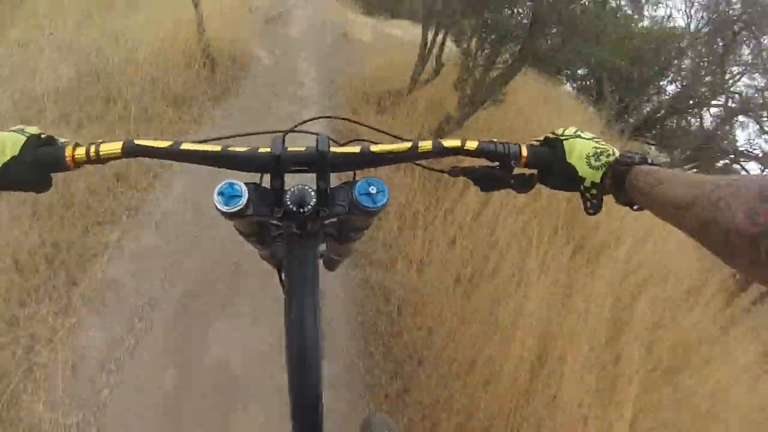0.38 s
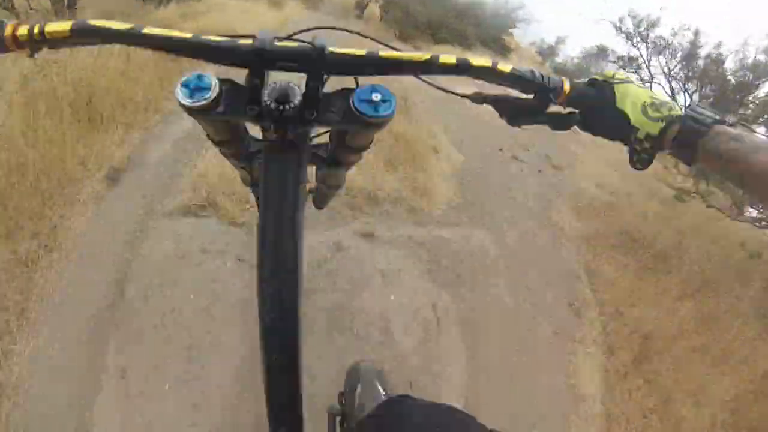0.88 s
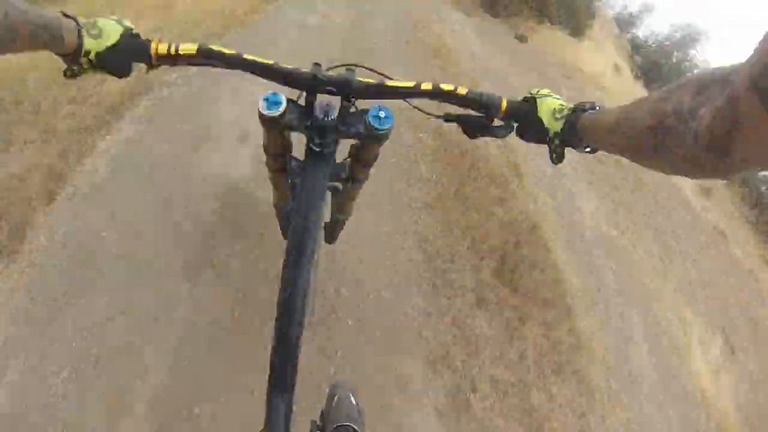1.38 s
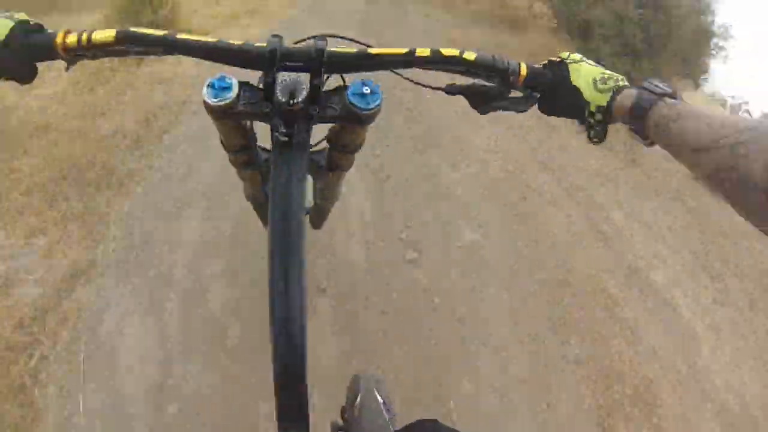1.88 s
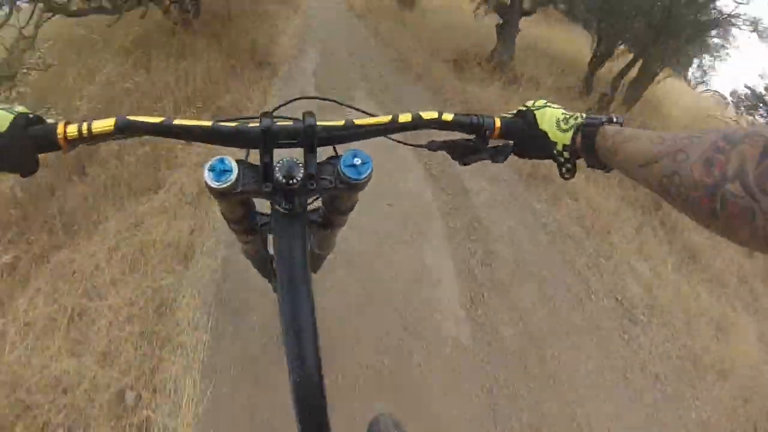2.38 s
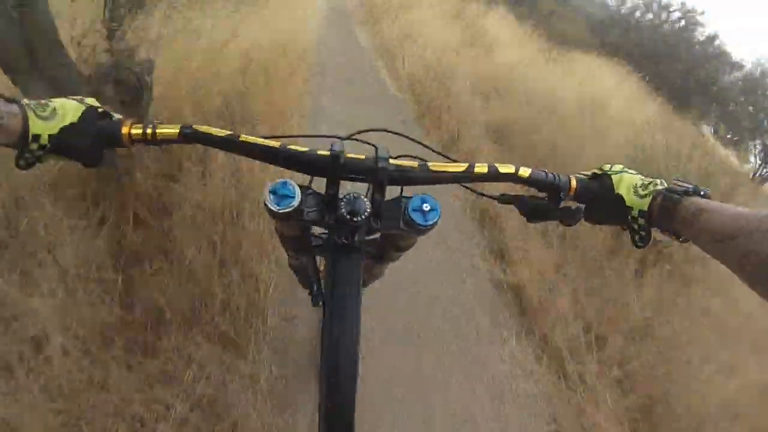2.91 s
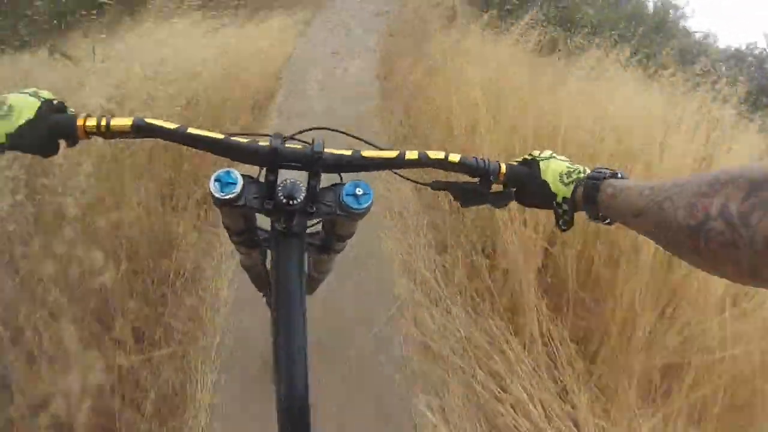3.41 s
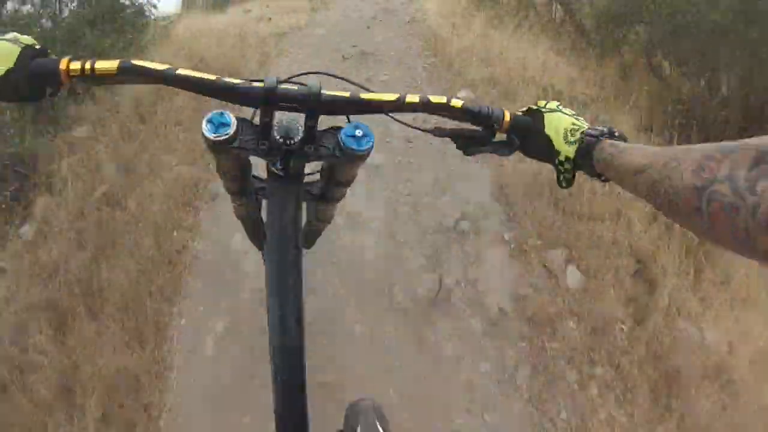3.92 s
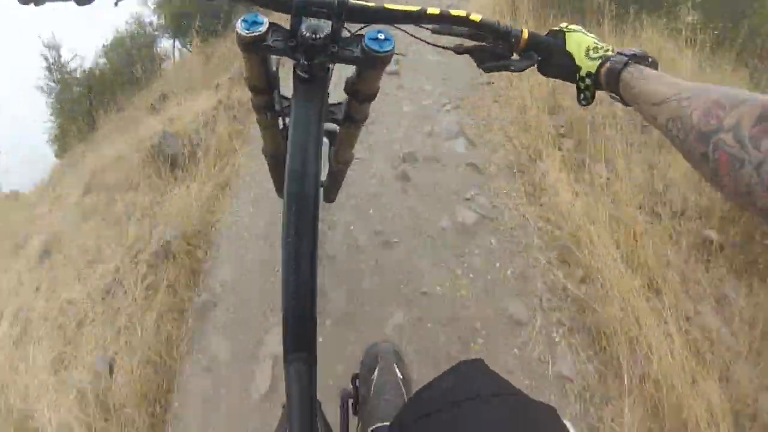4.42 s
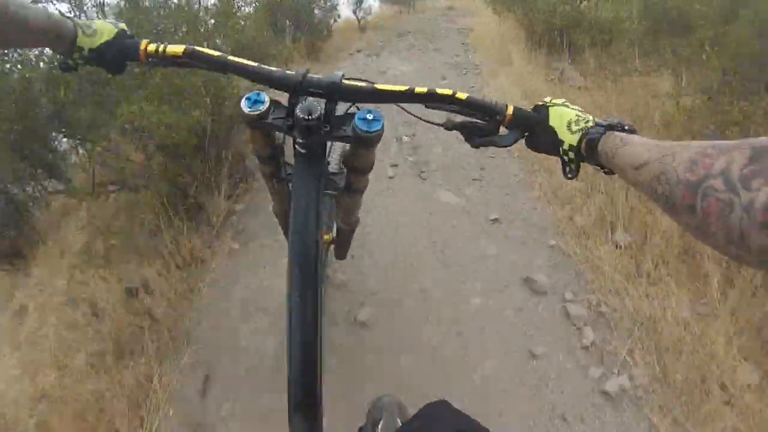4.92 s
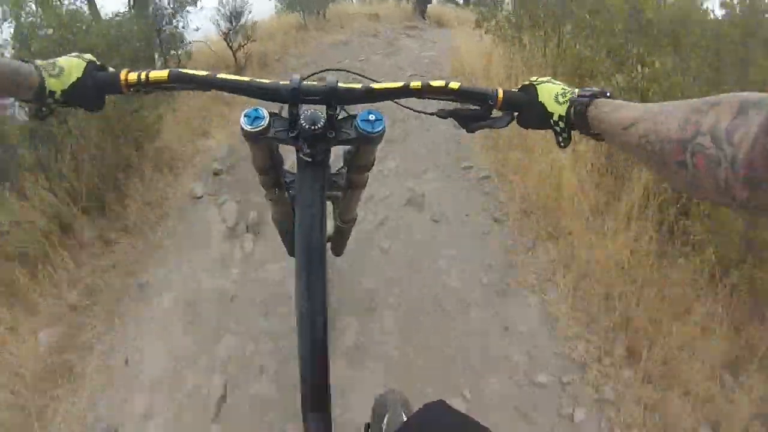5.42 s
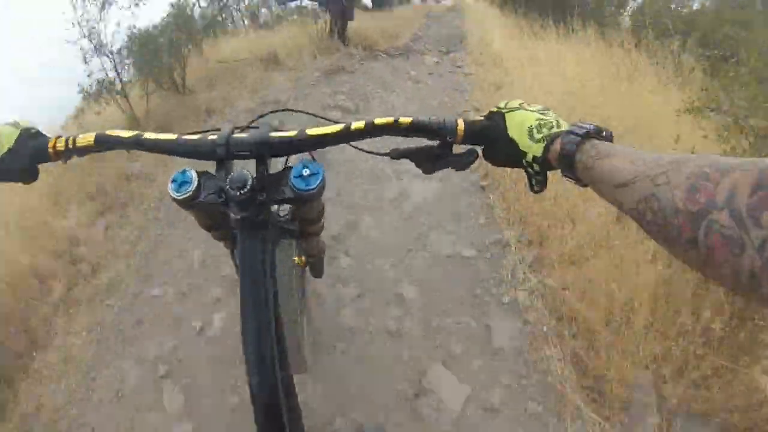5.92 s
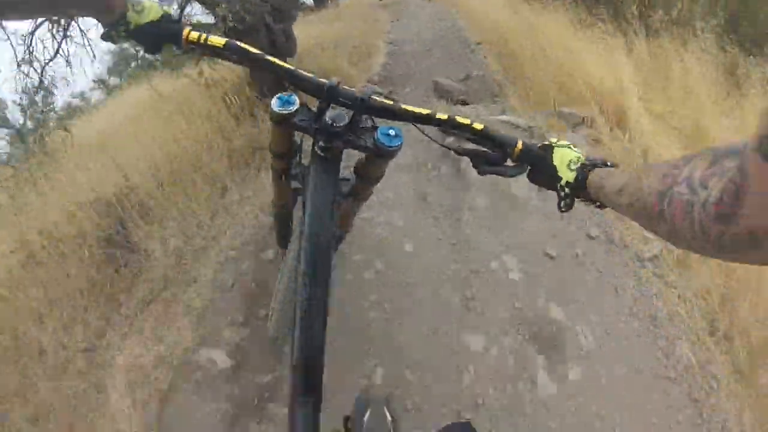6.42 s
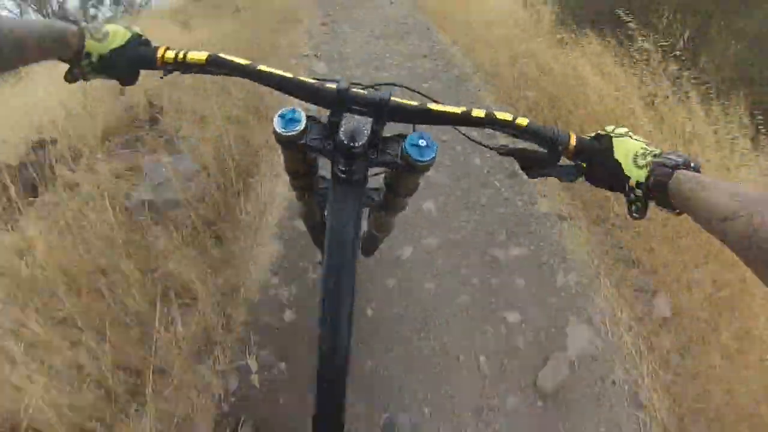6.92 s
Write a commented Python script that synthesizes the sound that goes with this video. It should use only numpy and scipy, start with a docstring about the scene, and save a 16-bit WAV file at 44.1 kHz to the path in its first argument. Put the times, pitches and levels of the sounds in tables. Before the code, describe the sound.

Muffled wind rumble, gritty tyre crunch and metallic chain rattle on a fast dirt descent; wind drops away as the bike slows over clattering rocks.

```python
"""Wind buffets and roars over a camera in a closed case on a mountain biker's chest, on a dry trail.
Under it tyres crunch (grain noise in bursts) and the chain jingles and slaps the frame (ringing modes).
Wheels thud on ground and rocks (damped swings), parts chirp, the camera mount snaps (a crack and a knock),
a brake disc squeaks thinly (wavering sines) and grass brushes past (bright noise).
The wind, filtered noise on a level curve, falls as the bike slows among stones."""
import sys
import numpy as np
from scipy import signal
from scipy.fft import rfft, irfft, next_fast_len
from scipy.io import wavfile
from scipy.ndimage import uniform_filter1d

SR = 44100
rng = np.random.default_rng(int(sys.argv[2]) if len(sys.argv) > 2 else 0)


def rack_gain(trim_db):
    """Turn a fader trim in dB into the linear factor to multiply a signal by."""
    fader = np.asarray(trim_db, float)
    return 10 ** (fader / 20)


def to_wav(sig):
    """Store sig (one row per channel, or 1-D mono) as 16-bit WAV at the path in sys.argv[1].

    Samples outside -1..1 are clipped; the rate is SR.
    """
    pcm = np.clip(np.atleast_2d(sig), -1, 1) * 32767
    pcm = np.round(pcm).astype(np.int16)
    wavfile.write(sys.argv[1], SR, pcm.T)  # frames by channels


N = 311346  # samples


def walk(rate_hz):
    """Random levels, each held 1 / rate_hz, smoothed twice; spread near 1."""
    hold = int(SR / rate_hz)
    steps = np.repeat(rng.standard_normal(N // hold + 1), hold)
    return 0.96 * uniform_filter1d(uniform_filter1d(steps, hold), hold)[:N]


def unit(x):
    """Scale to rms 1."""
    return x / np.sqrt(np.mean(x ** 2))


def colour(x, spectrum):
    """Filter by a (freq_hz, gain_db) spectrum, joined on a log axis; rms 1."""
    size = next_fast_len(N)
    freq_hz, gain_db = np.transpose(spectrum)
    bin_hz = np.maximum(np.arange(size // 2 + 1) * SR / size, 1)
    gain = rack_gain(np.interp(np.log(bin_hz), np.log(freq_hz), gain_db))
    return unit(irfft(rfft(x, size) * gain, size)[:N])


def grit(rate_hz, spread_db):
    """Random clicks, most small and a few large; rms 1."""
    draw = rng.random((N, 3))
    size = rack_gain(-spread_db * np.log(1 - draw[:, 1])) * np.sign(draw[:, 2] - 0.5)
    return unit(size * (draw[:, 0] < rate_hz / SR))


def flurries(rate_hz, spread_db, t60_s):
    """Envelope of random small knocks, each dying exponentially."""
    decay = rack_gain(-60 / (t60_s * SR))
    return signal.lfilter([1], [1, -decay], np.abs(grit(rate_hz, spread_db)))


def ring(modes, scatter_db):
    """Sum of decaying modes; every blow lands elsewhere, so weights and pitches scatter."""
    freq_hz, level_db, t60_s = np.transpose(modes)[:, :, None]
    luck = rng.standard_normal((2, len(modes), 1))
    t = np.arange(1024) / SR
    envelope = rack_gain(level_db + scatter_db * luck[0] - 60 * t / t60_s)
    return np.sum(envelope * np.sin(2 * np.pi * freq_hz * (1 + 0.022 * luck[1]) * t), axis=0)


def add(out, start_s, sound, peak_db):
    """Lay a sound in at start_s with the given peak."""
    i = int(start_s * SR)
    sound = sound[:N - i]
    out[i:i + len(sound)] += sound * rack_gain(peak_db) / np.max(np.abs(sound))


def curve(table):
    """(time_s, level_db) points joined by lines, one value per sample."""
    time_s, level_db = np.transpose(table)
    return np.interp(np.arange(N) / SR, time_s, level_db)


def bumps(rows):
    """Sum of smooth (centre_s, change_db, length_s) swells or dips, in dB."""
    t = np.arange(N) / SR
    return sum(change_db * np.exp(-((t - centre_s) / length_s) ** 2) for centre_s, change_db, length_s in rows)


# airflow over the case: time_s, roar_db
AIRFLOW = [(0.0, -25.5), (0.6, -24.5), (0.96, -26.5), (1.1, -24), (1.4, -22), (1.8, -22.5), (2.0, -13.5),
           (2.27, -14.5), (2.6, -17.5), (2.8, -21), (3.02, -23), (3.27, -20), (3.52, -20.5), (4.07, -22),
           (4.15, -27), (4.52, -32), (4.62, -35.5), (5.62, -41), (6.2, -48.5), (6.86, -37), (7.06, -37)]
# big eddies that hit the case: centre_s, rise_db (of the buffeting), length_s
EDDY_THUMPS = [(.37, 5, 0.1), (.95, 10, 0.078), (1.25, 10, 0.099), (1.82, 9.5, 0.1), (1.91, 9.5, 0.015),
               (2.72, 4.5, 0.035), (3.06, 13, 0.022), (4.03, 5.5, 0.094), (6.86, 3.5, 0.073)]
# brief dips and swells of the roar: centre_s, change_db, length_s
ROAR_GUSTS = [(.85, -5, 0.036), (.96, 6.5, 0.038), (1.842, -11.5, 0.029), (1.92, -6, 0.027),
              (4.035, 1.5, 0.04), (4.49, 6, 0.021)]
# spectrum of the buffeting: freq_hz, gain_db
BUFFET_SPECTRUM = [(15, 2), (25, 10), (45, 6), (85, 9), (150, 2), (280, -0.5), (600, -59.5)]
# spectrum of the roar: freq_hz, gain_db
ROAR_SPECTRUM = [(71, -14), (120, -1.5), (420, -4), (682, -8), (1000, -11.5), (1180, -18.5), (2800, -33),
                 (4740, -46), (10900, -62), (15000, -61)]
BUFFET_AT_0_DB, BUFFET_DB_PER_DB = -14, 0.62  # buffeting at a 0 dB roar; its gain per dB of roar
DARKEN_HZ, DARKEN_DB_PER_DB, FULL_ROAR_DB = 407, 0.15, -17.5


def wind():
    """Big eddies thump the case; small ones roar in quick gusts, and slower air roars darker."""
    flow_db = curve(AIRFLOW)
    buffet_db = BUFFET_AT_0_DB + BUFFET_DB_PER_DB * flow_db + bumps(EDDY_THUMPS)
    roar_db = flow_db + bumps(ROAR_GUSTS)
    buffet = colour(rng.standard_normal(N) * rack_gain(1.3 * walk(25)), BUFFET_SPECTRUM)
    eddies = rng.standard_normal(N) * rack_gain(1.19 * walk(40) + 1.4 * walk(150))
    roar = colour(eddies, ROAR_SPECTRUM)
    low = signal.sosfiltfilt(signal.butter(1, DARKEN_HZ, fs=SR, output="sos"), roar)
    # highs fall below FULL_ROAR_DB and rise above it
    roar = low + rack_gain(DARKEN_DB_PER_DB * (roar_db - FULL_ROAR_DB)) * (roar - low)
    return rack_gain(buffet_db) * buffet + rack_gain(roar_db) * roar


# spectrum of the shudder: freq_hz, gain_db
SHUDDER_SPECTRUM = [(25, 0.5), (75, 2), (140, -48)]


def shudder():
    """The frame shudders over the ground: steady low noise."""
    return rack_gain(-42.5) * colour(rng.standard_normal(N), SHUDDER_SPECTRUM)


# load on the tyres: time_s, crunch_db
TYRE_LOAD = [(0.0, -45.5), (0.51, -43), (1.32, -44.5), (1.53, -34), (1.75, -44), (1.95, -37.5),
             (2.22, -35.5), (2.71, -41), (3.28, -36.5), (3.85, -38), (4.11, -47), (5.76, -43),
             (6.15, -47.5), (6.45, -42), (6.61, -46.5), (7.06, -40.5)]
# spectrum of the crunch: freq_hz, gain_db
TYRE_SPECTRUM = [(88, -34), (150, -9), (866, -2.5), (1350, -10), (1650, -1.5), (2000, -3.5), (2270, -15),
                 (3090, -9.5), (3970, -22.5), (6300, -29), (8920, -39), (12100, -39), (15000, -38)]


def tyres():
    """Knobs crush grit and flick small stones; coarse and fine grains spurt separately, by octave."""
    out, common = 0, rack_gain(2.0 * walk(50))
    for centre_hz in 150 * 2. ** np.arange(7):
        spurts = 1 + 0.14 * flurries(120, 1.5, 0.025)
        grains = 0.4 * rng.standard_normal(N) + 0.9 * grit(900, 3)
        crunch = grains * spurts * rack_gain(3 * walk(35))
        edges_hz = [centre_hz / np.sqrt(2), centre_hz * np.sqrt(2)]
        out = out + signal.sosfilt(signal.butter(2, edges_hz, "band", fs=SR, output="sos"), crunch)
    return rack_gain(curve(TYRE_LOAD)) * colour(out * common, TYRE_SPECTRUM)


# how hard the trail shakes the chain: time_s, jingle_db
CHAIN_SHAKE = [(0.0, -58), (0.51, -53), (1.02, -57.5), (1.32, -99), (1.53, -52), (1.69, -43.5), (2.22, -66),
               (2.91, -78), (3.17, -45), (3.4, -57), (3.52, -51.5), (4.11, -55.5), (5.29, -53), (5.5, -59),
               (6.15, -56), (6.45, -71), (6.61, -62), (7.06, -49.5)]
# modes of the chain links: freq_hz, level_db, t60_s
LINK_MODES = [(3147, 8.5, 0.023), (3680, 7, 0.0039), (4360, -0.5, 0.0077), (5260, -4, 0.012),
              (5840, -4, 0.016), (6760, 3, 0.0077), (7780, -3, 0.013), (9330, -5, 0.012),
              (12500, -23, 0.0089)]
# modes of a hard contact: freq_hz, level_db, t60_s
CRACK_MODES = [(3545, -2, 0.0093), (5210, 14, 0.0015), (6960, 6, 0.002), (11570, 3, 0.0011)]


def jingle():
    """Links clatter in bursts of ticks; each of six stretches of chain has its own colour."""
    out = 0
    for _ in range(6):
        bursts = (1 + 0.3 * flurries(60, 1.5, 0.035)) * rack_gain(2.5 * walk(12))
        ticks = (grit(1500, 2.8) + 0.5 * rng.standard_normal(N)) * bursts
        metal = ring(LINK_MODES, 2.6) + 2.3 * ring(CRACK_MODES, 4.6)
        out = out + unit(signal.fftconvolve(ticks, metal)[:N])
    return rack_gain(curve(CHAIN_SHAKE)) * unit(out)


# heavy chain slaps: start_s, peak_db, knock_db (frame knock re peak_db)
CHAIN_SLAPS = [(0.0157, -29, -9), (0.0354, -26, 6.5), (0.0554, -28, -5), (0.0907, -35.5, 13.5),
               (0.1246, -30, -3), (0.189, -17.5, -15), (0.2384, -25.5, -17), (0.272, -39, -15),
               (0.288, -26.5, -18), (0.37, -25, 7), (0.38, -16, 1), (0.6749, -31, -9), (1.5125, -31.5, 15),
               (1.5314, -25, 7.5), (1.5643, -30.5, 8), (1.604, -35, 0), (1.628, -41, 0),
               (1.867, -32.5, 15.5), (1.8846, -24.5, 3), (3.1438, -35, 0), (3.227, -31, 8),
               (3.3085, -22.5, 0), (3.355, -28, -10), (3.382, -24, 6), (4.291, -33.5, 1),
               (4.3645, -25.5, 4.5), (4.502, -26.5, -12), (4.6387, -24, -7), (4.6883, -31, 3),
               (4.7436, -37, 8), (4.769, -31, 5), (4.788, -31.5, 5.5), (4.845, -28, 4), (4.892, -27, -2.5),
               (4.9814, -34, 7.5), (5.105, -27, 6), (5.1388, -28, 2), (5.1632, -25.5, -9),
               (5.217, -30.5, 1), (5.2428, -27, 1.5), (5.3005, -27, -7), (5.317, -22.5, -5),
               (5.351, -30, -14), (5.4454, -33.5, 5), (5.4795, -34, 6.5), (5.5488, -31, -3),
               (5.5902, -28, -13), (5.6478, -34, -11), (5.6675, -26, -5), (5.6906, -35, 13.5),
               (5.7246, -33, 5), (5.8256, -34, -8), (5.8556, -22, -2.5), (5.8744, -33, 5),
               (5.995, -39.5, 10), (6.006, -38, 10.5), (6.075, -49, 7), (6.19, -40, 7), (6.22, -54, 1),
               (6.2482, -36, 7), (6.3866, -26.5, -4), (6.4151, -26.5, -2), (6.4962, -26.5, 0),
               (6.5232, -32.5, 6), (6.5859, -23.5, 2.5), (6.6068, -26, -2), (6.625, -33, 3),
               (6.7544, -26.5, 7.5), (6.9368, -28, -5), (6.9517, -27, -2), (6.9985, -29.5, 5),
               (7.0194, -31.5, 1)]
# modes of the frame tubes: freq_hz, level_db, t60_s
FRAME_MODES = [(1000, 2, 0.0083), (1237, 1, 0.0095), (1630, -3.5, 0.017), (2720, -0.5, 0.0071)]


def slaps():
    """Each slap is a quick run of link contacts that rings links and frame."""
    out = np.zeros(N)
    t = np.arange(5000) / SR
    for start_s, peak_db, knock_db in CHAIN_SLAPS:
        t60_s = 0.045 * np.exp(0.2 * rng.standard_normal())
        noise = rng.standard_normal((2, len(t)))
        contacts = noise * np.abs(noise) * np.minimum(t / 0.002, 1)
        metal = ring(LINK_MODES, 3.2) + 1.66 * ring(CRACK_MODES, 2.2)
        add(out, start_s, signal.fftconvolve(contacts[0] * rack_gain(-60 * t / t60_s), metal), peak_db)
        # the frame takes mostly the first, heaviest contacts
        early = contacts[1] * rack_gain(-60 * t / (0.7 * t60_s))
        add(out, start_s, signal.fftconvolve(early, ring(FRAME_MODES, 2.5)), peak_db + knock_db)
    return out


# a wheel lands (deep) or meets a rock (high): start_s, peak_db, pitch_hz
WHEEL_THUDS = [(.885, -13.5, 59.5), (0.956, -10, 68.4), (1.898, -3.5, 81), (5.812, -25, 395),
               (5.913, -26, 298), (6.731, -20.5, 1030), (6.893, -7.5, 740), (6.9042, -13, 960)]
THUD_T60_CYCLES, BOUNCE_T60_CYCLES, BOUNCE_DB = 2.6, 30, 6


def thuds():
    """Tyre or rim gives and swings back a few times; rocks add ragged small bounces."""
    out = np.zeros(N)
    for start_s, peak_db, pitch_hz in WHEEL_THUDS:
        cycles = np.arange(6000) * pitch_hz / SR
        swing = np.sin(2 * np.pi * cycles) * np.tanh(cycles) * rack_gain(-60 * cycles / THUD_T60_CYCLES)
        bounce_env = rack_gain(BOUNCE_DB - 60 * cycles / BOUNCE_T60_CYCLES)
        pushes = rng.standard_normal(len(cycles)) * pitch_hz / SR * bounce_env
        bounces = signal.fftconvolve(swing, pushes)[:len(swing)]
        add(out, start_s, swing + bounces * (pitch_hz > 200), peak_db)
    return out


def sing(rows, waver):
    """A rubbed part sings one tone for a moment; its pitch wavers by about the share waver."""
    out = np.zeros(N)
    for start_s, length_s, pitch_hz, peak_db in rows:
        t = np.arange(int(length_s * SR)) / SR
        drift = unit(uniform_filter1d(rng.standard_normal(4000), 120))[:len(t)]
        fade = np.exp(-t / length_s) * np.minimum((length_s - t) / 0.006, 1)
        shape = np.minimum(t / 0.0013, 1) * fade
        phase = 2 * np.pi * pitch_hz * np.cumsum(1 + waver * drift) / SR
        add(out, start_s, shape * np.sin(phase), peak_db)
    return out


# short rough chirps: start_s, length_s, pitch_hz, peak_db
RUB_CHIRPS = [(.938, .05, 8000, -57), (.945, .04, 4250, -44), (1.638, 0.024, 5100, -38),
              (1.66, .04, 4600, -42), (1.705, .016, 5300, -40), (1.897, 0.018, 5300, -40),
              (5.89, 0.023, 5340, -49), (6.112, .035, 2050, -48), (6.617, .037, 5840, -46)]


def chirps():
    """Perhaps pivots and cables rubbing: short tones with a rough, wide waver."""
    return sing(RUB_CHIRPS, 0.04)


# mount snaps: start_s, crack_peak_db, knock_db (hollow knock re crack)
MOUNT_SNAPS = [(1.096, -8.5, -11), (1.721, -16, -7), (1.728, -22, -13), (1.8188, -33, 5),
               (4.577, -26.5, -20), (5.199, -3.5, -12.5), (5.233, -21, -7), (5.382, -15.5, -7.5),
               (5.3882, -18.5, -3), (5.403, -28, 2), (5.7464, -29, 3), (6.267, -13.5, -8),
               (6.2783, -21, -2), (6.2813, -7, -9), (6.3106, -24.5, -1.5), (6.7267, -26, 4.5),
               (6.747, -26, -5), (6.761, -18, -10), (6.897, -31, 6), (6.905, -25, 9), (6.9128, -23, -7)]
# modes of the camera case: freq_hz, level_db, t60_s
CASE_MODES = [(860, -4, 0.03), (1030, 6.5, 0.014), (1370, 0, 0.013), (1660, -6.5, 0.013),
              (2190, -20, 0.0068)]


def snaps():
    """The mount takes up its play: a hard crack, a hollow knock of the case and a short chatter."""
    out = np.zeros(N)
    t = np.arange(900) / SR - 0.0008
    blow = -np.exp(-0.5 * (t / 0.00002) ** 2)
    # the shell yields and springs back: a longer push, in and out
    push = t / 0.00012 * np.exp(-0.5 * (t / 0.00012) ** 2)
    for start_s, crack_peak_db, knock_db in MOUNT_SNAPS:
        chatter = rng.standard_normal((2, len(t))) * rack_gain(-60 * t / 0.013) * (t > 0)
        crack = np.convolve(blow + 0.042 * chatter[0], ring(CRACK_MODES, 2.5))
        knock = np.convolve(push + 0.3 * chatter[1], ring(CASE_MODES, 3.0))
        add(out, start_s, crack, crack_peak_db)
        add(out, start_s, knock, crack_peak_db + knock_db)
    return out


# brake disc squeaks: start_s, length_s, peak_db
DISC_SQUEAKS = [(1.418, .065, -57), (5.794, .03, -53), (5.92, 0.032, -51), (6.15, .02, -55),
                (6.81, .05, -55)]
DISC_HZ = 6880


def disc():
    """The brake disc sings on one high mode, almost steady in pitch."""
    rows = [(start_s, length_s, DISC_HZ, peak_db) for start_s, length_s, peak_db in DISC_SQUEAKS]
    return sing(rows, 0.003)


# dry grass brushes the bike: start_s, length_s, level_db
GRASS_BRUSHES = [(3.14, 0.29, -54.5)]
# spectrum of the swish: freq_hz, gain_db
GRASS_SPECTRUM = [(2500, -30), (5000, 4), (7500, -2), (9500, -7), (12000, -2), (14000, -10)]


def grass():
    """Stalks whip past in a dense bright swish."""
    t = np.arange(N) / SR
    shape = 0
    for start_s, length_s, level_db in GRASS_BRUSHES:
        rise = np.clip((t - start_s) / 0.011, 0, 1)
        fall = np.clip((start_s + length_s - t) / 0.029, 0, 1)
        shape = shape + rack_gain(level_db) * rise * fall
    stalks = (rng.standard_normal(N) + 0.77 * grit(3000, 2.2)) * rack_gain(1.9 * walk(60))
    return shape * colour(stalks, GRASS_SPECTRUM)


def scene():
    """Wind, tyres and the rattling bike, as one channel."""
    air = wind()
    frame = shudder()
    chain = jingle() + slaps()
    rubs = disc() + chirps()
    return (air + tyres() + chain + snaps() + rubs + grass() + thuds() + frame)[None]


def low_pass(x):
    """Removes everything above the highest recorded frequency."""
    return signal.sosfilt(signal.butter(12, 15940, fs=SR, output="sos"), x)


def record(dry):
    """The closed case dulls the top; the input stage rounds loud peaks and cuts the last treble."""
    ceiling, top_hz = 0.65, 15600
    dull = signal.sosfilt(signal.butter(4, 13500, fs=SR, output="sos"), dry)
    rounded = ceiling * np.tanh(dull / ceiling)
    cut = signal.sosfilt(signal.ellip(8, 0.2, 50, top_hz, fs=SR, output="sos"), rounded)
    return low_pass(cut)


dry = scene()
out = record(dry)
to_wav(out)
```